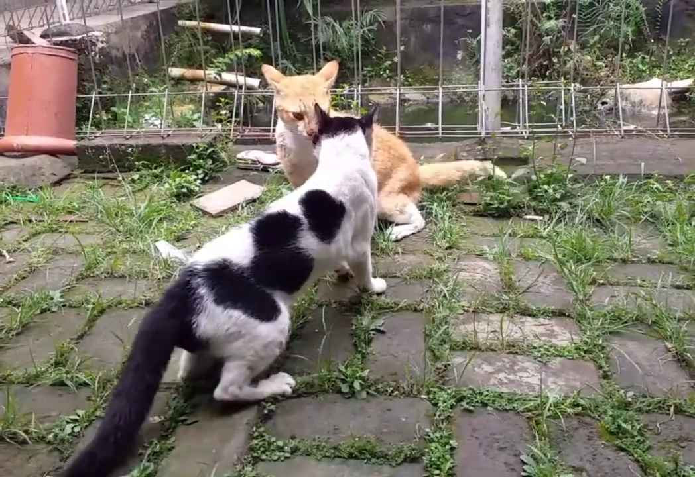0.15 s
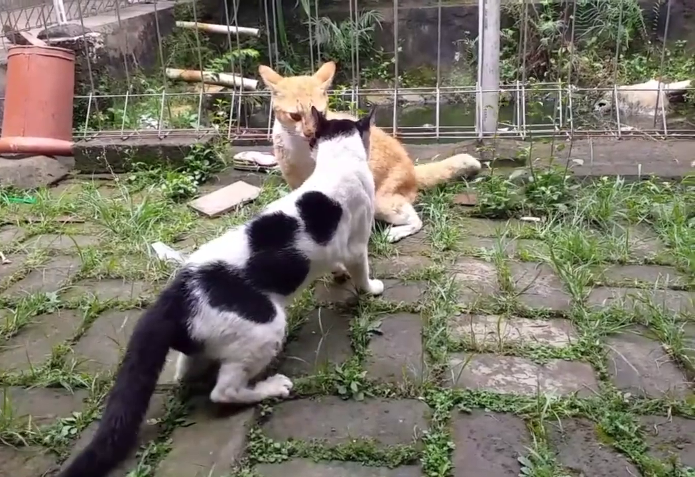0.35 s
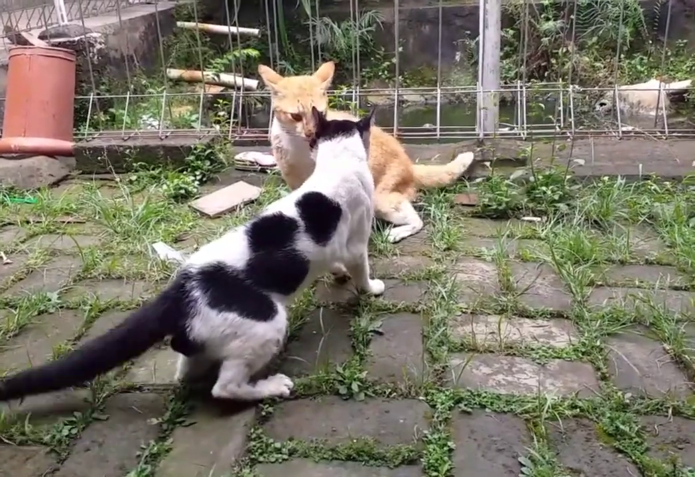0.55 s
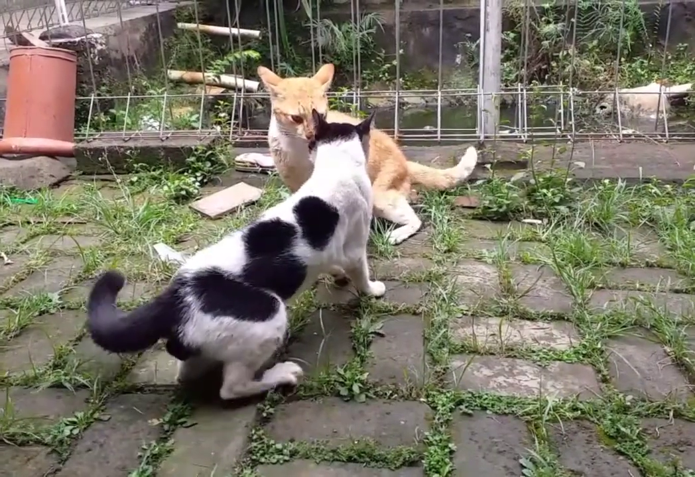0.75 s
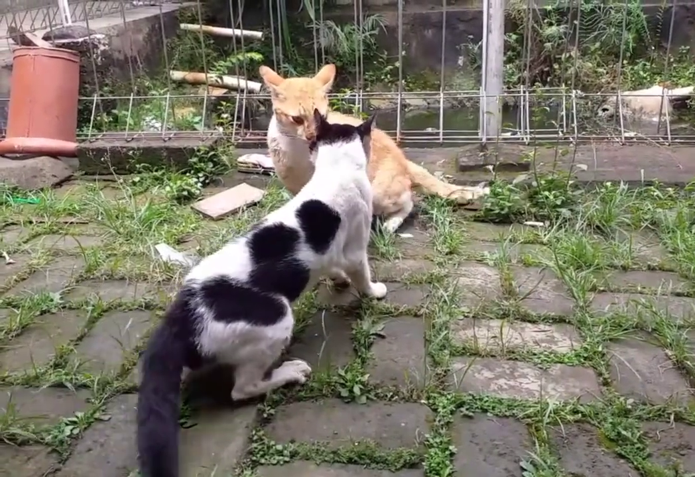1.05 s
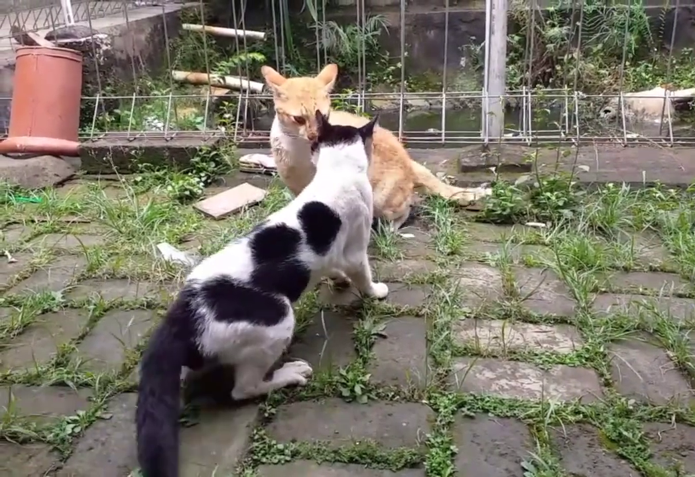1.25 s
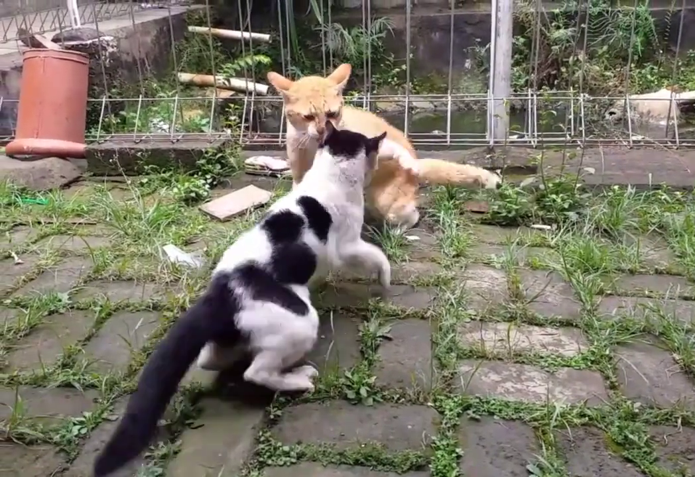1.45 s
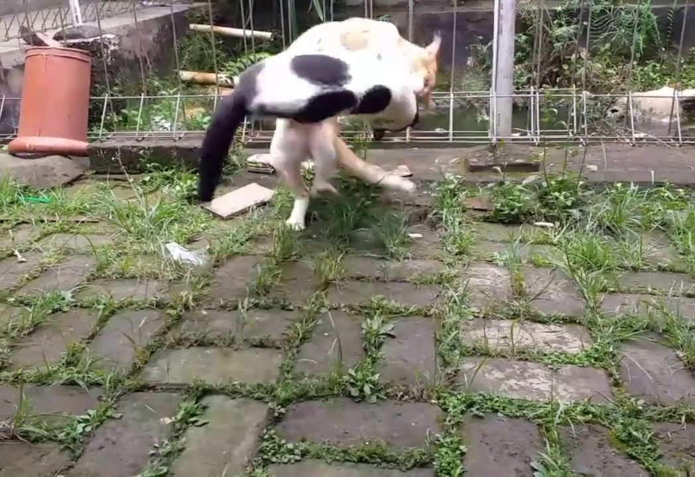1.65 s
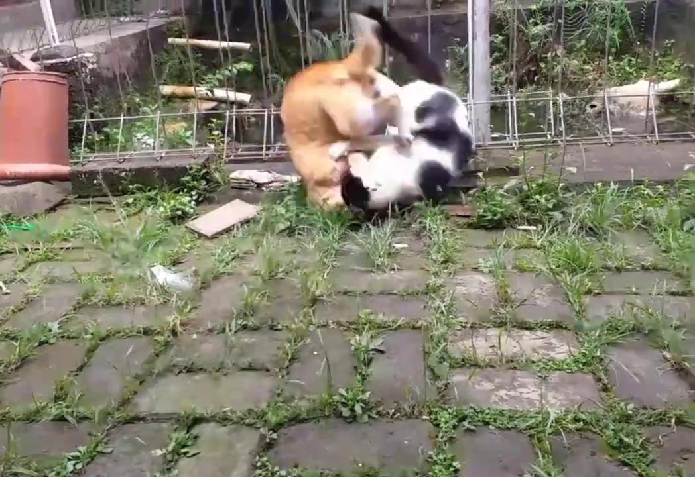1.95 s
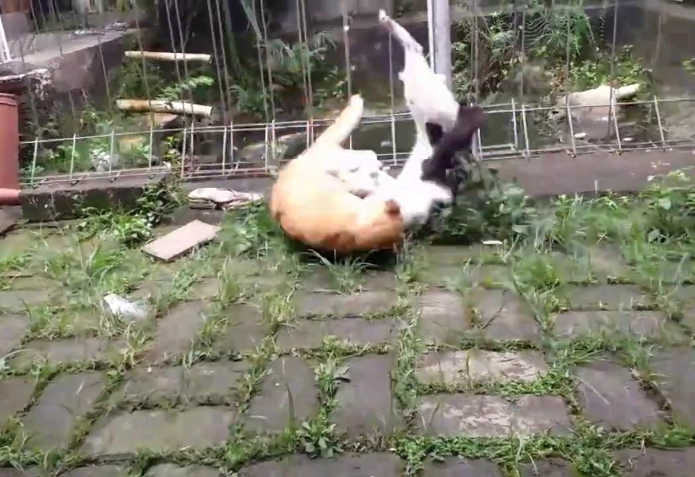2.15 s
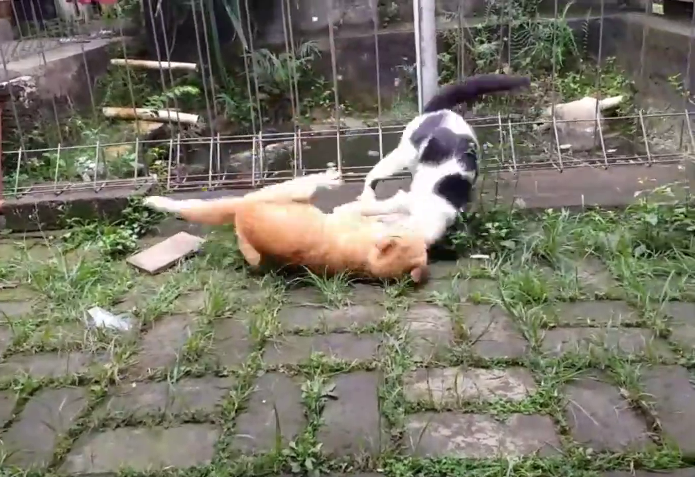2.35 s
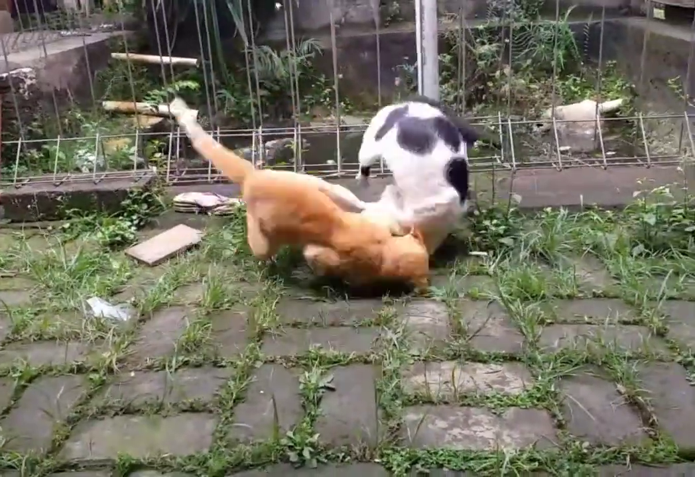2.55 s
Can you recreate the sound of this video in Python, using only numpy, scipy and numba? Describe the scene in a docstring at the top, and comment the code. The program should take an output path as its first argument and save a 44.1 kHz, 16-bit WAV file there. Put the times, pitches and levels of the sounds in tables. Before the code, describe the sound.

A cat yowls, screams and snarls in a fight with another cat in a yard.

```python
"""First you hear a cat's rising yowl, with a second cat moaning low beneath it, in a paved yard.
The yowl cracks to half pitch, bursts into a scream and ends in snarls as the two tumble over grass
and stones, while the second cat holds a high wail. Each voice is a fast train of throat pulses mixed
with raspy breath. The first cat's mouth moves and rings at two changing frequencies; the second
cat's stays still. The yard walls answer with a short echo."""
import sys
import numpy as np
from scipy import signal
from scipy.fft import rfft, irfft
from scipy.io import wavfile
from scipy.ndimage import uniform_filter1d, minimum_filter1d
from numba import njit

SR = 44100
rng = np.random.default_rng(int(sys.argv[2]) if len(sys.argv) > 2 else 0)


def waveform_to_disk(signal):
    """Save audio, clipped to [-1, 1], as 16-bit WAV at the path in sys.argv[1]."""
    frames = np.transpose(np.atleast_2d(signal))
    scaled = np.clip(frames, -1, 1) * 32767
    samples = np.round(scaled).astype(np.int16)
    wavfile.write(sys.argv[1], SR, samples)


N = 119070
TIME = np.arange(N) / SR
TOP_HZ = 15800  # upper edge of the sound


# The yowl's throat: t/s, pitch/Hz, rasp/0-1, strength of the half pitch
YOWL_VOICE = [(.06, 199, .6, .1), (.175, 260, .4, 0), (.274, 303, .2, 0), (.416, 322.5, .12, 0),
              (.625, 372.6, .15, .04), (.7, 374, .03, .1), (.85, 403, .22, .4), (.93, 390, .12, 0),
              (1.01, 397.8, .12, .03), (1.108, 392, .05, 0), (1.122, 378, .92, 2), (1.2, 378, .65, 4),
              (1.4, 367, .9, 3.6)]
# Where the mouth rings: t/s, lower ring/Hz, upper ring/Hz
YOWL_MOUTH = [(.08, 855, 2530), (.2, 1284, 2226), (.47, 1387, 2204), (.58, 1630, 2450), (0.681, 1820, 2730),
              (.78, 1655, 2437), (1.089, 1634, 2525), (1.202, 1680, 2207)]
# How loud each part is: t/s, base tone/dB, lower ring/dB, upper ring/dB, treble/dB
YOWL_LEVEL = [(0.082, -40, -44.5, -54, -50), (.18, -34, -28.5, -33.5, -37.5),
              (0.3, -35.5, -24, -23.5, -36.5), (.44, -31, -22.5, -27.5, -35.5),
              (0.484, -35.5, -23, -14.5, -34.5), (0.631, -30, -15.5, -24, -34), (0.7, -30.5, -6, -32, -32),
              (.75, -27, -28, -16, -33.5), (0.852, -32.5, -11, -18.5, -30.5),
              (0.961, -28, -24.5, -21.5, -30), (1.006, -31.5, -13.5, -16.5, -30),
              (1.098, -27.5, -20, -21.5, -29.5), (1.138, -26.5, -14.5, -19.5, -32.5),
              (1.279, -27, -13, -17.5, -27.5), (1.393, -27, -16.5, -16.5, -29.5)]
# Tone of the treble: f/Hz, level/dB
YOWL_TREBLE = [(2500, -4.5), (3300, 3), (4000, 4), (4700, 2.5), (5250, 9), (5700, 1), (6500, 0),
               (7700, -12.5), (9300, -21), (12000, -16), (16000, -31)]


def yowl():
    """The first cat's long cry climbs, then cracks as its pulses turn uneven."""
    whistle_hz = 19.9 * curves(YOWL_VOICE)[0]  # a high ring climbs with the pitch
    sound = cry(YOWL_VOICE, YOWL_MOUTH, YOWL_LEVEL, YOWL_TREBLE, whistle_hz, whistle_db=9,
                lower_width_hz=630, upper_width_hz=503, jitter=.0068, waver=.0028, overtone_db=-7)
    return sound * gate(YOWL_LEVEL, attack_s=.0037, release_s=.0033)


# The scream's throat: t/s, pitch/Hz, rasp/0-1, strength of the half pitch
SCREAM_VOICE = [(1.37, 443, .6, 0.17), (1.44, 561.2, 1, 1.5), (1.53, 587.5, 0.83, 0.99),
                (1.59, 588.6, 0.31, 0.18), (1.7, 623.3, 0.85, 0.13)]
# Where the mouth rings: t/s, lower ring/Hz, upper ring/Hz
SCREAM_MOUTH = [(1.368, 1110, 2140), (1.414, 1840, 2930), (1.5, 1900, 3570), (1.57, 1636, 3010),
                (1.68, 1870, 3080)]
# How loud each part is: t/s, base tone/dB, lower ring/dB, upper ring/dB, treble/dB
SCREAM_LEVEL = [(1.373, -35, -24, -32, -28), (1.408, -38, -14.5, -18.5, -20.5),
                (1.46, -57, -14.5, -14.5, -16.5), (1.59, -41.5, -16, -17, -15.5),
                (1.638, -38.5, -14.5, -20, -12), (1.699, -41.5, -16, -20.5, -11.5),
                (1.721, -30, -26, -17, -36), (1.769, -79, -31, -43, -46)]
# Path of a high, whistling ring: t/s, f/Hz
SCREAM_WHISTLE = [(1.5, 4000), (1.6, 3900), (1.64, 5600)]
# Tone of the treble, shared with the snarls: f/Hz, level/dB
FIGHT_TREBLE = [(2200, -63), (2750, 9.5), (3800, 7.5), (5200, 6), (6000, 7.5), (8000, -2), (9300, -24),
                (11500, -14), (16000, -27.5)]


def scream():
    """The same throat, higher and shakier, with broader mouth rings."""
    whistle_hz = curves(SCREAM_WHISTLE)[0]
    sound = cry(SCREAM_VOICE, SCREAM_MOUTH, SCREAM_LEVEL, FIGHT_TREBLE, whistle_hz, whistle_db=2,
                lower_width_hz=1400, upper_width_hz=1800, jitter=.02, waver=.01, overtone_db=-20)
    return sound * gate(SCREAM_LEVEL, attack_s=.017, release_s=.011)


def cry(voice, mouth, loudness, treble, whistle_hz, whistle_db,
        lower_width_hz, upper_width_hz, jitter, waver, overtone_db):
    """A round base tone, plus throat pulses ringing in the mouth and in the treble."""
    pitch_hz, rasp, half_pitch = curves(voice)
    lower_hz, upper_hz = curves(mouth)
    base_gain, lower_gain, upper_gain, treble_gain = undb(curves(loudness))
    source, phase = throat(pitch_hz, rasp, half_pitch, jitter, waver)
    cracked = np.clip(half_pitch, 0, 1)  # a cracked voice swaps its octave for 2.5 times the pitch
    overtone = (1 - cracked) * np.sin(2 * phase) + cracked * np.sin(2.5 * phase)
    base_gain = base_gain * flutter(2 * rasp)  # rasp shakes the base tone
    base = np.sqrt(2) * (np.sin(phase) + undb(overtone_db) * flutter(2) * overtone)
    lower = flutter() * resonance(source, lower_hz, lower_width_hz)
    upper = flutter() * resonance(source, upper_hz, upper_width_hz)
    whistle = undb(whistle_db) * band_pass(source, whistle_hz, 880.0)
    top = steady(colour(source + whistle, treble))
    return base_gain * base + lower_gain * lower + upper_gain * upper + treble_gain * top


def throat(hz, rasp, half_pitch, jitter, waver):
    """Pulses with a puff of breath each cycle; also gives their phase (place in the cycle)."""
    hz = hz * (1 + waver * wander(25.22) + jitter * (.317 + rasp) * wander(226))
    phase = 2 * np.pi * np.cumsum(hz) / SR
    harmonics = np.floor(TOP_HZ / hz)
    pulses = steady(np.sin((harmonics + .5) * phase) / (np.sin(phase / 2) + 1e-12) - 1)
    pulses = pulses * (1 + half_pitch * np.cos(phase / 2))  # every other pulse differs: half pitch
    smear = np.exp(-1j * np.pi * np.fft.rfftfreq(N, 1 / SR) ** 2 / 1e6)  # spreads each pulse in time
    pulses = irfft(rfft(pulses) * smear, N)
    puffs = unit(rng.standard_normal(N) * (1 + .7 * np.cos(phase)) * undb(2 * wander(70)))
    rasp = np.clip(rasp, 0, 1)
    return np.sqrt(1 - rasp ** 2) * paving(pulses) + rasp * puffs, phase


# Tone of the high sizzle: f/Hz, level/dB
SIZZLE_COLOUR = [(9000, -18), (12000, 0)]


def lunge():
    """A torn squeal sweeps up as the mouth snaps open; a distortion-like sizzle tops the scream."""
    squeal = resonance(rng.standard_normal(N), curves(SCREAM_MOUTH)[0], width_hz=390)
    sizzle = unit(colour(rng.standard_normal(N), SIZZLE_COLOUR))
    return (undb(-8.5) * squeal * swell_at(peak_s=1.405, half_s=.02)
            + undb(-40) * sizzle * swell_at(peak_s=1.49, half_s=.052))


# One snarl a row: peak t/s, half length/s, top pitch/Hz, rasp/0-1, lower ring/Hz,
# lower ring/dB, upper ring/dB, treble/dB
SNARLS = [(1.856, 0.029, 560.4, 0.46, 1210, -30.5, -35, -28),
          (1.934, 0.034, 515, 0.64, 1036, -30, -17.5, -29.5),
          (2.007, 0.022, 569.7, 0.74, 1386, -21, -12, -20), (2.057, .024, 509, 0.61, 1550, -20, -16, -21.5),
          (2.197, 0.022, 529.6, 0.89, 1140, -19.5, -26, -39),
          (2.257, 0.041, 462.9, 0.73, 1140, -30.5, -36, -48),
          (2.366, 0.0573, 414.7, 0.88, 1042, -29.5, -43, -44.5),
          (2.44, 0.03, 445.8, 0.78, 1182, -24.5, -30.5, -41.5),
          (2.52, 0.04, 380, 0.87, 1160, -28.5, -39.5, -44.5)]


def snarls():
    """Short raspy bursts run together; the pitch rises and sags with each one."""
    peak_s, half_s, top_hz, rasp, mouth_hz, *levels = np.array(SNARLS, float).T[:, :, None]
    from_peak = np.minimum(((TIME - peak_s) / half_s) ** 2, 40)
    swell = np.exp(-from_peak)

    def blend(value):
        """Glide from one snarl's value to the next."""
        return (swell * value).sum(0) / swell.sum(0)

    pitch_hz = blend(top_hz * (1 - .07 * np.minimum(from_peak, 2)))
    source, phase = throat(pitch_hz, blend(rasp), half_pitch=.28, jitter=.045, waver=.018)
    lower_gain, upper_gain, treble_gain = (np.sqrt((swell * undb(db) ** 2).sum(0)) for db in levels)
    base = undb(-35) * swell.sum(0) * undb(2.1 * wander(57)) * np.sin(phase)
    return (base + lower_gain * resonance(source, blend(mouth_hz), width_hz=900)
            + upper_gain * resonance(source, hz=np.full(N, 1883.0), width_hz=510)
            + treble_gain * steady(colour(source, FIGHT_TREBLE)))


# Two moans (a list each) and the wail: t/s, pitch/Hz, level/dB
MOANS = [
    [(0, 229.2, -44), (.2, 221.6, -38.5), (.46, 256, -40), (.65, 242.2, -39.5), (.89, 237.8, -39)],
    [(1.3, 232, -38.5), (1.38, 260, -38)],
]
WAIL = [(1.73, 538, -22), (1.77, 546.5, -28), (1.85, 556.7, -19), (1.93, 573.4, -28), (2.19, 565.9, -24),
        (2.265, 547.6, -30.5)]
# The tone the throat gives them: f/Hz, level/dB
MOAN_THROAT = [(230, 1.5), (480, 9.5), (720, -19), (4000, -36)]
WAIL_THROAT = [(550, -9.5), (1100, -13.5), (1680, 4.5), (2230, 1.5), (3200, -6.5), (4000, -8), (4500, -1.5),
               (5000, -9.5), (7800, -17), (10000, -41)]


def second_cat():
    """Low moans during the stand-off, a thin wavering wail in the fight."""
    moans = sum(plain_call(moan, MOAN_THROAT, rasp=.214, jitter=.051, waver=.007) for moan in MOANS)
    wail = plain_call(WAIL, WAIL_THROAT, rasp=.25, jitter=.009, waver=.0065)
    return moans + wail * flutter()


def plain_call(table, tone, rasp, jitter, waver):
    """Throat pulses pass through a mouth held still."""
    hz, db = curves(table)
    source, _ = throat(hz, rasp, 0, jitter, waver)
    return steady(colour(source, tone)) * undb(db) * gate(table, attack_s=.0075, release_s=.031)


# How the rustle of grass swells: t/s, level/dB
RUSTLE = [(1.78, -83), (1.87, -44), (2.7, -49)]
# Paws and bodies hitting the ground: t/s, level/dB, fade time/s
SCUFFS = [(1.823, -28, 0.042), (2.305, -50, 0.0037)]
# Tone of the grass alone, then of the whole scuffle: f/Hz, level/dB
GRASS_COLOUR = [(200, -15), (900, -8)]
SCUFFLE_COLOUR = [(70, -34), (170, 9), (12000, 1)]


def scuffle():
    """Grass crackles under the cats; each scrape starts suddenly and dies away."""
    crackle = rng.standard_normal(N) * undb(4 * wander(300))
    grass = unit(colour(crackle, GRASS_COLOUR)) * undb(curves(RUSTLE)[0])
    hits = sum(undb(db) * (TIME >= start_s) * np.exp(-np.abs(TIME - start_s) / fade_s)
               for start_s, db, fade_s in SCUFFS)
    return colour(grass + rng.standard_normal(N) * hits, SCUFFLE_COLOUR)


def paving(x):
    """The bounce off the stones shifts as the head moves, so single overtones swell and fade."""
    lag_s = .001 + .00013 * wander(5)
    return x + undb(-5) * np.interp(TIME - lag_s, TIME, x)


def walls(x, delay_s=.012, fade_60db_s=.36, low_cut_hz=770, echo_db=-7):
    """Paving and walls add a short, bright scatter of echoes."""
    tail = rng.standard_normal(N) * (TIME > delay_s) * np.exp(-np.log(1000) * TIME / fade_60db_s)
    tail = signal.sosfilt(signal.butter(2, low_cut_hz, "high", fs=SR, output="sos"), tail)
    return x + undb(echo_db) * signal.fftconvolve(x, tail / np.linalg.norm(tail))[:N]


# Tone of the yard's background: f/Hz, level/dB
YARD_COLOUR = [(25, -63), (65, -0.5), (3000, -4), (16000, -23.5)]
# A preset curve for the recorder's gain on the hiss: t/s, level/dB
RECORDER_GAIN = [(0, -50), (.9, -37.5), (1.4, -46)]


def yard():
    """Steady outdoor hiss; the recorder's gain turns it up, then down as the cats get loud."""
    return unit(colour(rng.standard_normal(N), YARD_COLOUR)) * undb(curves(RECORDER_GAIN)[0])


def undb(db):
    """Turn decibels into a multiplier."""
    return 10 ** (np.asarray(db) / 20)


def unit(x):
    """Scale the average strength (rms) to 1."""
    return x / np.sqrt(np.mean(x ** 2))


def steady(x, size=1500):
    """Hold the strength near 1 from moment to moment."""
    power = uniform_filter1d(uniform_filter1d(x ** 2, size), size)
    return x / np.sqrt(np.abs(power) + 1e-18)


def curves(table):
    """Join each column's points with straight lines in time."""
    times, *columns = np.array(table, float).T
    return [np.interp(TIME, times, column) for column in columns]


def gate(table, attack_s, release_s):
    """Fade in before a table's first time and out after its last."""
    early_s = np.maximum(table[0][0] - TIME, 0)
    late_s = np.maximum(TIME - table[-1][0], 0)
    return np.exp(-early_s / attack_s - late_s / release_s)


def swell_at(peak_s, half_s):
    """A brief, smooth rise and fall."""
    return np.exp(-((TIME - peak_s) / half_s) ** 2)


def wander(rate_hz):
    """Smooth random motion, about 1 in size."""
    f = np.fft.rfftfreq(N, 1 / SR)
    return unit(irfft(rfft(rng.standard_normal(N)) / (1 + (f / rate_hz) ** 2), N))


def flutter(amount=1):
    """A quick tremble in loudness, about 1.4 dB times the amount."""
    return undb(1.4 * amount * wander(rate_hz=16))


def colour(x, points):
    """Shape the tone along an outline of f/Hz, level/dB points."""
    hz, db = np.array(points, float).T
    f = np.maximum(np.fft.rfftfreq(N, 1 / SR), 1)
    return irfft(rfft(x) * undb(np.interp(np.log(f), np.log(hz), db)), N)


@njit
def band_pass(x, hz, width_hz):
    """Keep the sound near a moving frequency."""
    y, band_state, low_state = np.empty(len(x)), 0., 0.
    for i in range(len(x)):
        tuning, damping = np.tan(np.pi * hz[i] / SR), width_hz / hz[i]
        band = (band_state + tuning * (x[i] - low_state)) / (1 + tuning * (tuning + damping))
        band_state = 2 * band - band_state
        low_state += 2 * tuning * band
        y[i] = damping * band
    return y


def resonance(x, hz, width_hz):
    """A mouth ring: one steep-sided band at even loudness."""
    for _ in range(3):
        x = band_pass(x, hz, float(width_hz))
    return steady(x)


def scene():
    """Both cats and their scuffle echo over the quiet yard."""
    background = yard()
    first_cat = yowl() + scream() + lunge() + snarls()
    return (walls(first_cat + second_cat() + scuffle()) + background)[None]


def record(dry, ceiling=.95):
    """Turn the loudest peaks down briefly and cut the highest treble."""
    gain = ceiling / np.maximum(np.abs(dry), ceiling)
    gain = uniform_filter1d(minimum_filter1d(gain, size=129), size=129)
    return signal.sosfilt(signal.ellip(10, .2, 80, TOP_HZ, fs=SR, output="sos"), dry * gain)


dry = scene()
out = record(dry)
waveform_to_disk(out)
```